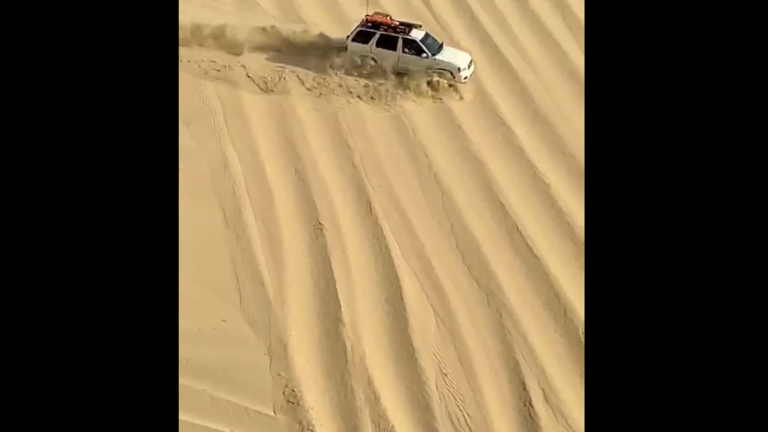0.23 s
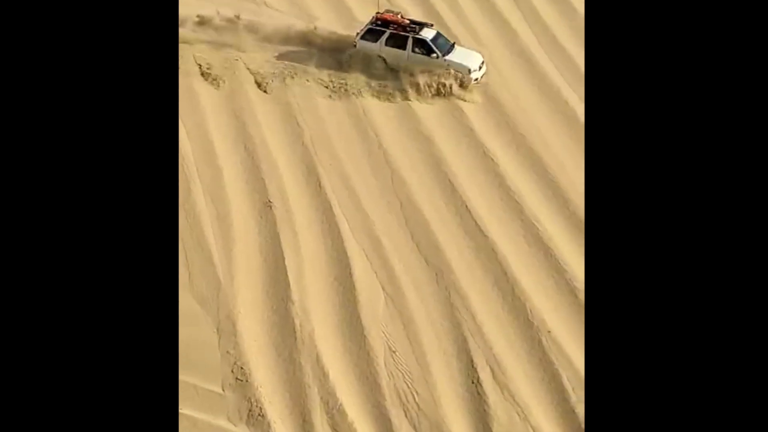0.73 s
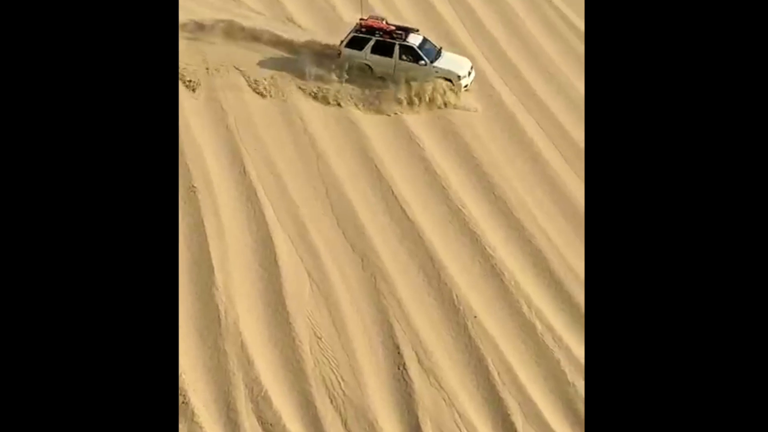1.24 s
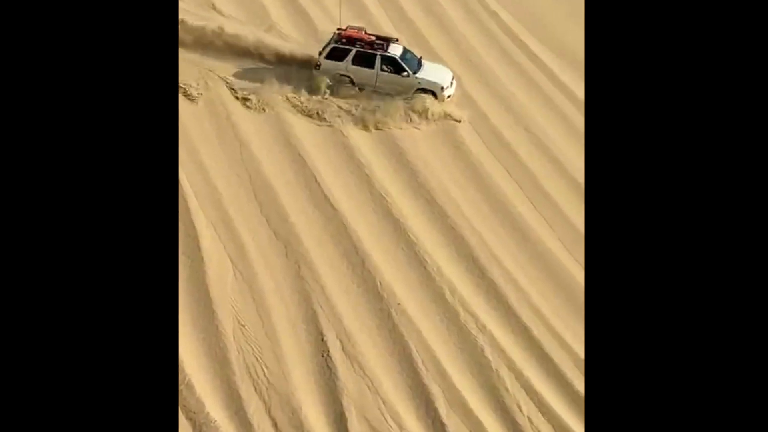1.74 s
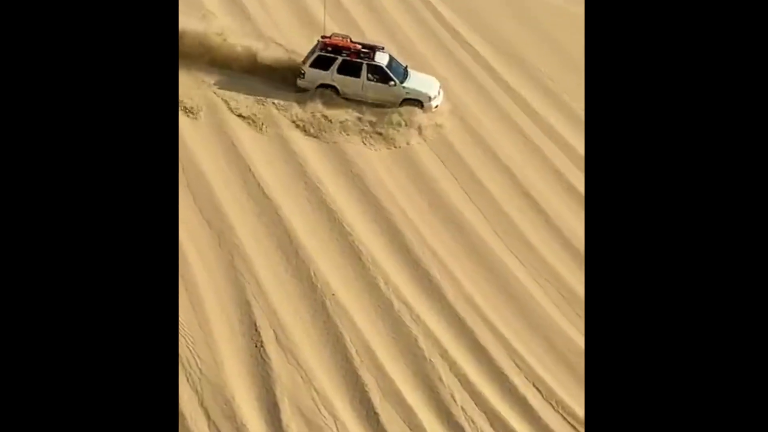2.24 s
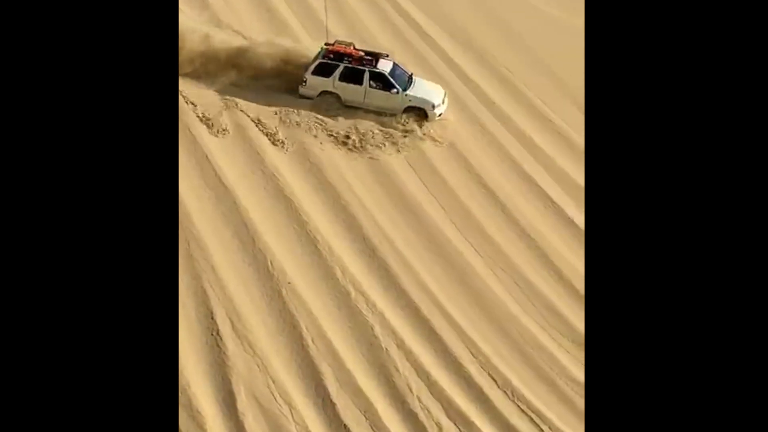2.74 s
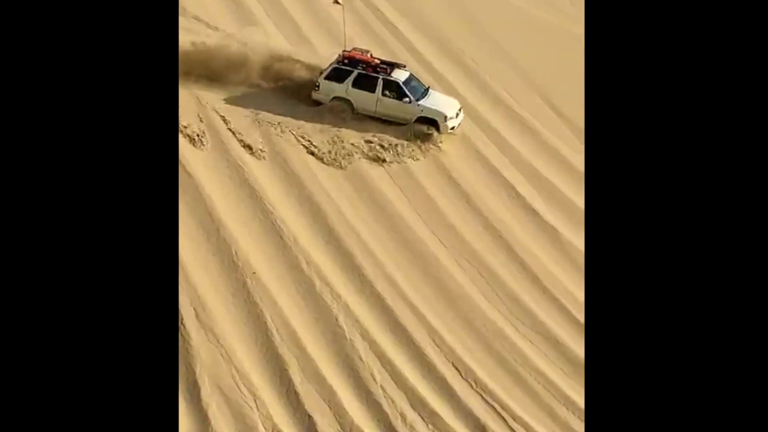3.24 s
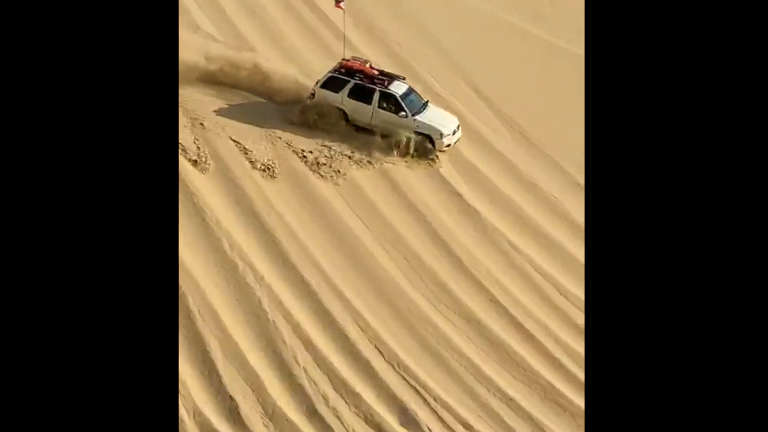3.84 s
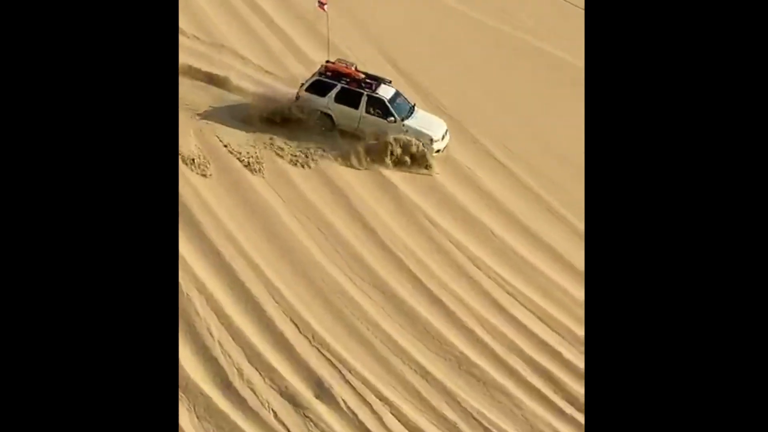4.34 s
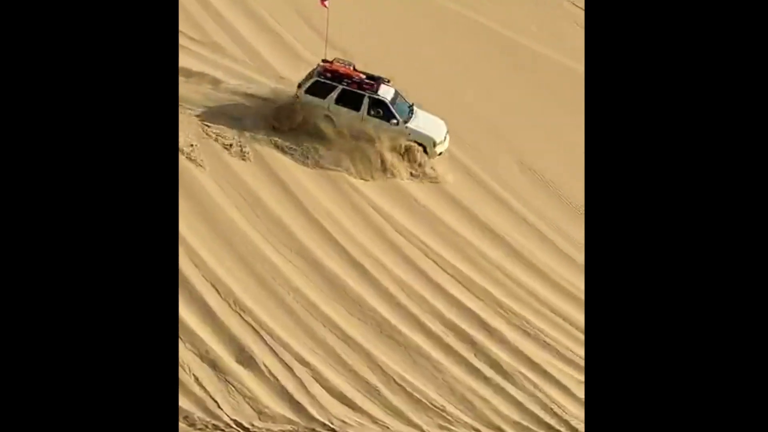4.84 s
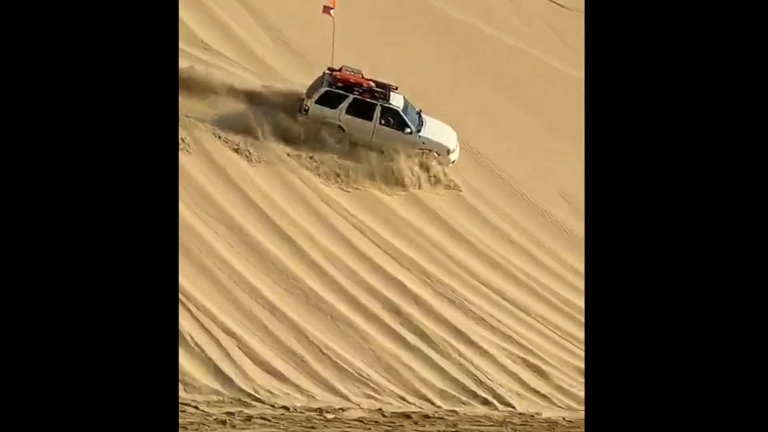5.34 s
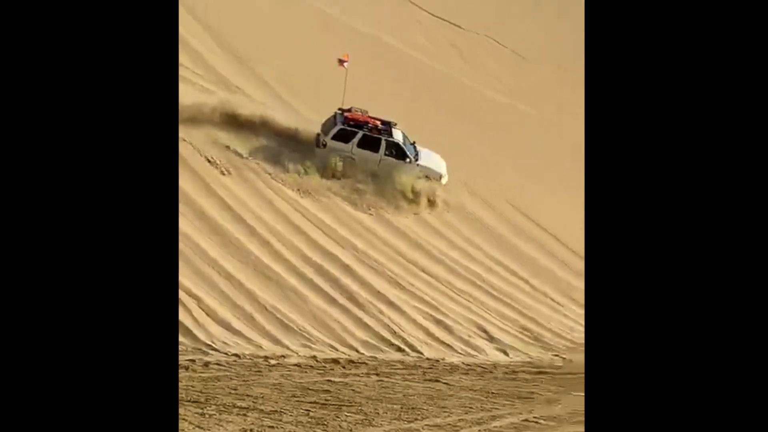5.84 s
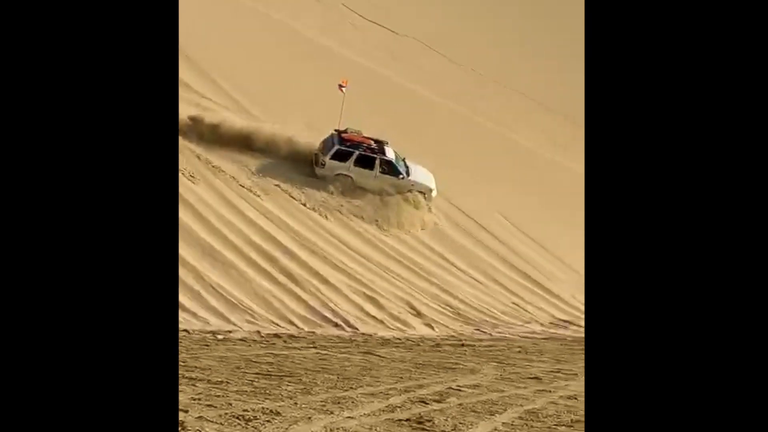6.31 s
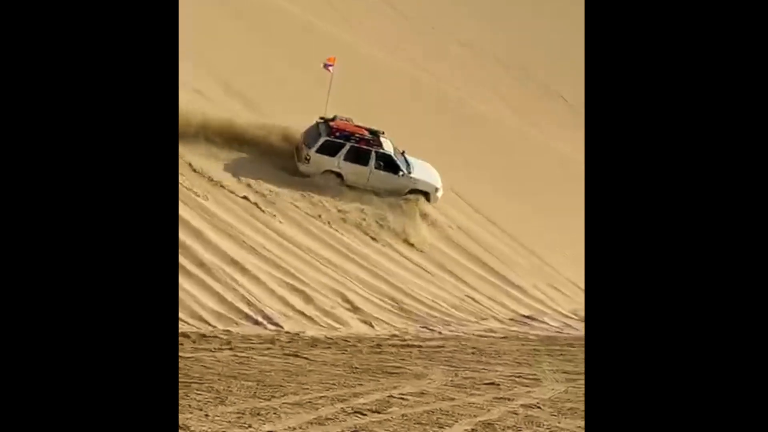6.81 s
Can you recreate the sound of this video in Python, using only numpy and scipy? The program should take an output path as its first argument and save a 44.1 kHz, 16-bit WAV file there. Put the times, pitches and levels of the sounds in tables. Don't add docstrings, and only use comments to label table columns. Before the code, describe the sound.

Outdoors on an open dune, an off-road vehicle works at full load some distance away: raspy intake roar, droning engine tone and hissing sand spray, with small grit ticks. Heavy wind buffets the hand-held stereo microphone in the first two seconds. The drone then recedes and a lower eight-cylinder exhaust rises behind, with engine and sand surging near the end.

```python
import sys
import numpy as np
from scipy import signal
from scipy.fft import rfft, irfft, next_fast_len
from scipy.io import wavfile
from scipy.ndimage import uniform_filter1d, map_coordinates

SR = 44100
rng = np.random.default_rng(int(sys.argv[2]) if len(sys.argv) > 2 else 0)


def voltage_ratio(decibels):
    exponent = np.asarray(decibels, float) / 20
    return 10 ** exponent


def log_audio(samples):
    frames = np.atleast_2d(samples).T
    limited = np.clip(frames, -1, 1)
    pcm = np.round(limited * 32767).astype(np.int16)
    wavfile.write(sys.argv[1], SR, pcm)


N = 311787


def unit(x):
    return x / np.sqrt(np.mean(x ** 2) + 1e-20)


def along(points, hz):
    f, v = np.transpose(points)
    return np.interp(np.log(hz + 1), np.log(f + 1), v)


def curves(rows):
    s, *cols = np.transpose(rows)
    return [np.interp(np.arange(N) / SR, s, c) for c in cols]


def wobble(rate):
    return map_coordinates(rng.standard_normal(4000), [np.arange(N) * np.clip(rate, 0, 500) / SR])


def gate(start, length, rise, fall):
    t = np.arange(N) / SR - start
    return np.clip(np.minimum(t / rise + .5, (length - t) / fall + .5), 0, 1)


def filtered(x, response):
    m = next_fast_len(N + 8192)
    return irfft(rfft(x, m) * response(np.fft.rfftfreq(m, 1 / SR)), m)[..., :N]


def rush(spectrum, patchy_db):
    z = signal.stft(rng.standard_normal((2, N)), nperseg=512)[2]
    field = uniform_filter1d(rng.standard_normal(z.shape[1:]), size=3, axis=0)
    field = uniform_filter1d(field, size=36, axis=1)
    pair = signal.istft(z * voltage_ratio(patchy_db * unit(field)), nperseg=512)[1][:, :N]
    return unit(filtered(pair, lambda hz: voltage_ratio(along(spectrum, hz))))


def order(firing_hz, multiple, flutter_db, smear):
    phase = 2 * np.pi * multiple * np.cumsum(firing_hz) / SR
    phase = phase + smear * wobble(14) + rng.uniform(0, 2 * np.pi)
    return unit(voltage_ratio(flutter_db * wobble(18)) * np.sin(phase))


def climber():
    # (time [s], firing rate [Hz], 4th order level [dB], facing: 3rd order over 4th [dB])
    near_engine = [(0, 256.5, -43, 0), (.58, 257, -41, 1), (.85, 246.5, -44, 1), (1.08, 253.5, -40, -1),
                   (1.42, 248.5, -43, 0), (1.75, 263, -42, -6), (2.0, 255.5, -47, -4), (2.3, 262, -47, -4),
                   (2.6, 257, -47, -6), (2.88, 255, -42, -10), (3.15, 249.5, -38, -12),
                   (3.42, 243.5, -39, -10), (3.53, 243, -58, 4), (5.3, 250, -60, 10), (5.9, 250, -54, 8),
                   (6.3, 254, -48, 3), (6.7, 251, -50, 5), (7.07, 252, -47, 0)]
    # (multiple [1], level re 4th order [dB])
    sixths = [(19 / 6, -13), (21 / 6, -11), (23 / 6, -13), (7, -15), (8, -14)]
    firing, fourth_db, facing_db = curves(near_engine)
    tone = voltage_ratio(fourth_db + facing_db) * order(firing, multiple=3, flutter_db=2.5, smear=.45)
    tone += voltage_ratio(fourth_db) * order(firing, multiple=4, flutter_db=2.5, smear=.35)
    tone += voltage_ratio(fourth_db - 12) * order(firing, multiple=25 / 6, flutter_db=2.5, smear=.3)
    sings_out = gate(1.75, .6, rise=.25, fall=.25)
    tone += voltage_ratio(-43) * sings_out * order(firing, multiple=23 / 6, flutter_db=4, smear=.4)
    for multiple, db in sixths:
        tone += voltage_ratio(fourth_db + db + 2.5 * wobble(2)) * order(firing, multiple, flutter_db=3, smear=.5)
    return tone


def roar():
    # (time [s], engine load level [dB], thrown sand level [dB])
    wheel_work = [(0.0, -53.5, -50.5), (0.06, -37.5, -46), (0.69, -38, -43.5), (0.81, -37.5, -42.5),
                  (1.08, -37, -44), (1.34, -40.5, -43), (2.11, -36.5, -45.5), (2.64, -32, -41),
                  (3.01, -38.5, -41.5), (3.31, -35.5, -41.5), (3.8, -39, -45), (5.4, -38, -42.5),
                  (5.55, -37.5, -45.5), (5.9, -33.5, -41.5), (6.4, -33, -39), (6.81, -31.5, -41),
                  (7.07, -32, -40.5)]
    # (frequency [Hz], density [dB per Hz])
    intake_colour = [(500, -120), (670, -44), (705, -5.5), (770, 1), (921, -3), (1000, -5), (1090, -11.5),
                     (1180, -6.5), (1500, -11), (1700, -35), (2500, -120)]
    # (frequency [Hz], density [dB per Hz])
    spray_colour = [(880, -11), (1500, -3.5), (1950, 0), (2120, -4), (2310, -2), (2480, -6.5), (3000, -5.5),
                    (3900, -46.5), (6600, -120)]
    # (frequency [Hz], density [dB per Hz])
    fizz_colour = [(2000, -120), (2750, -38.5), (3000, -2.5), (3400, 0), (3800, 0), (4200, -4.5),
                   (4600, -8), (5050, 0), (5300, -39.5), (6500, -120)]
    # (frequency [Hz], density [dB per Hz])
    hiss_colour = [(4000, -120), (4850, -35), (5100, -3), (5600, 0), (6300, -2), (7000, -6), (7700, -10),
                   (8500, -12), (9500, -16), (10100, -17), (11100, -12), (11850, -14), (12000, -90)]
    load_db, sand_db = curves(wheel_work)
    mean_db = sand_db.mean()

    def layer_db(under_db, grows):
        return mean_db + under_db + grows * (sand_db - mean_db) + 0.6 * wobble(2.604)

    slap = wobble(9) + 0.43 * wobble(25)
    intake = voltage_ratio(load_db - 1.5) * rush(intake_colour, patchy_db=2.5)
    spray = voltage_ratio(layer_db(0, grows=0.69) + 0.24 * slap) * rush(spray_colour, patchy_db=2)
    fizz = voltage_ratio(layer_db(-5.5, grows=0.8) + 0.54 * slap) * rush(fizz_colour, patchy_db=1.8)
    hiss = voltage_ratio(layer_db(-5, grows=1) + .5 * slap) * rush(hiss_colour, patchy_db=2.07)
    return intake + spray + fizz + hiss


def bounce(x):
    # (start [s], end [s], centre [Hz], gain [dB])
    streaks = [(1.6, 3.1, 3400, 4.5), (2.5, 2.5, 3300, 6), (1.8, 3.05, 1920, 4), (2.5, 3, 3770, -3),
               (3.6, 7, 2440, -0.5), (3, 4.6, 1050, 6), (3.9, 4.3, 2250, -8), (4.55, 4.9, 1167, 9.5),
               (4, 6.4, 957, -8), (3.5, 2.8, 3100, -1.5), (4.2, 4.8, 1590, -5), (4.5, 5.5, 1290, 4),
               (5.8, 6.2, 2060, -9), (6, 6.4, 5930, -3.5), (5.6, 6.15, 1800, 0.5), (6.5, 6.45, 2800, 1),
               (6, 7.4, 4600, 2), (6, 11, 5050, 7), (5.5, 7.1, 4100, 3.5), (6.6, 6.1, 1100, -3.5),
               (5.8, 6.7, 3700, 4), (6, 6.6, 2730, 4.5), (8.1, 5, 3400, 5.5), (5.5, 7.9, 1350, -4.5),
               (5.5, 5.9, 1240, -8), (3.6, 5, 3900, 0), (5, 4.4, 1650, 1.5), (6.6, 8, 3200, 1),
               (3.5, 3.05, 930, -7.5), (3.5, 2.7, 1800, 0), (2.2, 2.1, 2500, 1.5), (1.7, 1.94, 4200, 6),
               (0.5, 0.96, 970, 0), (5.5, 5.2, 4300, 2), (7, 7.3, 4300, 3), (5.8, 7.2, 4350, 3.5),
               (1.3, 2.2, 800, 3.5), (2.5, 3.15, 600, -7), (2.1, 3.06, 760, -6), (6, 7.2, 2300, -5),
               (6.3, 6.4, 13000, -0.5), (6, 7.2, 5300, -6), (6.85, 7.2, 2200, 10), (6.1, 7.2, 2060, 3.5)]
    streak_db, width = 2, 0.073
    hz, t, z = signal.stft(x, SR, nperseg=2048, noverlap=1536)
    field = uniform_filter1d(rng.standard_normal(z.shape[1:]), size=2, axis=0)
    field = uniform_filter1d(field, size=24, axis=1)
    gain_db = streak_db * unit(field)
    for start, end, centre_hz, db in streaks:
        progress = np.clip((t - start) / (end - start), 0, 1)
        swell = np.sqrt(np.abs(np.sin(np.pi * progress)))
        band = np.exp(-((hz / centre_hz - 1) / width) ** 2)
        gain_db = gain_db + db * np.outer(band, swell)
    return signal.istft(z * voltage_ratio(gain_db), SR, nperseg=2048, noverlap=1536)[1][:, :N]


def murmur():
    # (start [s], length [s], depth at the edge band [dB])
    guard = [
        (0.405, 0.1, -12),
        (0.7, 0.065, -22),
        (0.95, 0.053, -14),
        (1.012, 0.079, -23),
        (1.153, 0.078, -29),
        (1.28, 0.04, -14),
        (1.332, 0.094, -28),
        (2.793, 0.25, -4.5),
        (2.948, 0.066, -4),
    ]
    guard_db = sum(db * gate(s, length, rise=0.045, fall=0.045) for s, length, db in guard)
    turn_db = -6 * gate(5.17, N / SR, rise=0.96, fall=1)
    return voltage_ratio(-39.5 + turn_db + 0.56 * guard_db), voltage_ratio(-43 + guard_db)


def steadied(x):
    power = np.abs(uniform_filter1d(x ** 2, size=int(0.055 * SR), axis=-1)) + 1e-3
    return unit(x / power ** (0.44 / 2))


def wind():
    # (time [s], strength [dB], reach: flutter over rumble [dB])
    breeze = [(0, -42, -10), (.3, -36.5, -6), (.7, -34, -18.5), (1.11, -34, -20), (1.4, -32.5, -18),
              (1.8, -27.5, -7), (2.2, -33.5, -3), (2.38, -34.5, -3.5), (2.6, -32.5, -1), (2.74, -36.5, -4),
              (2.82, -38, -10), (3.5, -36, -15.5), (4.2, -41, -19.5), (4.8, -41.5, -13), (5.2, -33, -17.5),
              (5.85, -38.5, -6), (6.5, -36.5, -10), (7.07, -32.5, -15.5)]
    # (start [s], length [s], strength [dB], reach [dB])
    gusts = [(0.256, 0.066, -28.5, -21.5), (0.426, 0.067, -29, -10.5), (0.511, 0.035, -23, -10),
             (0.553, 0.043, -23, -14.5), (0.591, 0.037, -22, -16), (0.683, 0.026, -31.5, -21),
             (0.989, 0.022, -31.5, -20.5), (1.193, 0.017, -26, -13), (0.728, 0.026, -21, -21),
             (0.775, .03, -16.5, -10), (0.818, 0.095, -16.5, -11), (0.903, 0.037, -18, -16),
             (1.046, 0.026, -22.5, -12), (1.161, 0.04, -26.5, -24), (1.219, 0.07, -17.5, -14.5),
             (1.294, 0.029, -18, -34), (1.338, 0.038, -25, -27), (1.439, 0.098, -27, -20),
             (1.503, 0.071, -16.5, -16), (1.613, 0.071, -24, -10.5), (1.69, .04, -17.5, -7),
             (1.734, 0.029, -17, -7), (1.79, 0.03, -25.5, 0), (2.132, .08, -29.5, -4),
             (3.427, 0.034, -36, -8.5), (3.566, 0.068, -34.5, -10.5), (5.497, .1, -34, -8.5),
             (6.486, 0.11, -36.5, -7), (6.727, 0.071, -35.5, -24)]
    gust_low_db = np.array(np.array([[-4], [2], [0], [0]]))
    # (frequency [Hz], density [dB per Hz])
    rumble_colour = [(20, -65), (33, -15.5), (48, -6), (70, -1), (180, -5.5), (220, -42), (400, -120)]
    # (frequency [Hz], density [dB per Hz])
    body_colour = [(100, -120), (150, -37), (180, 3), (340, 1.5), (390, -23), (600, -120)]
    # (frequency [Hz], density [dB per Hz])
    flutter_colour = [(200, -120), (300, -33.5), (340, -2.5), (437, -0.5), (520, -7.5), (640, -33.5),
                      (800, -120)]
    # (frequency [Hz], density [dB per Hz])
    edge_colour = [(350, -120), (480, -30), (520, 0), (700, -2), (740, -40), (900, -120)]
    shares, offsets_db = np.array([[0], [0.41], [1], [2.5]]), np.array([[0], [-0.5], [0], [0]])
    plume = 2.8

    breeze_db, reach_db = curves(breeze)
    power = voltage_ratio(breeze_db + 1.6 * wobble(12) + shares * reach_db) ** 2
    for s, length, db, reach in gusts:
        gust = voltage_ratio(db + gust_low_db + shares * reach) * gate(s, length, rise=.012, fall=.015)
        power += gust ** 2
    rumble, body, flutter, edge = voltage_ratio(offsets_db) * np.sqrt(power)

    force = np.clip((20 * np.log10(rumble) + 36) / 14, .1, 1)
    lumps = voltage_ratio(force * (1.2 * wobble(30) + 2.5 * wobble(70)))
    lumps /= np.sqrt(np.abs(uniform_filter1d(lumps ** 2, size=4000)) + 1e-9)

    car_flutter, car_edge = murmur()
    eddies = lumps * rumble * steadied(rush(rumble_colour, patchy_db=3))
    eddies += lumps * body * steadied(rush(body_colour, patchy_db=0.0))
    eddies += np.hypot(lumps ** np.sqrt(plume) * flutter, car_flutter) * rush(flutter_colour, patchy_db=2.5)
    return eddies + np.hypot(lumps ** plume * edge, car_edge) * rush(edge_colour, patchy_db=1.0)


def crosswind():
    # (time [s], strength [dB])
    side_air = [(0, -36.5), (.3, -59), (.45, -31), (.62, -40.5), (.85, -26), (1.08, -35), (1.28, -31),
                (1.55, -36.5), (1.9, -40), (2.3, -54.5), (2.85, -32.5), (3.15, -50.5), (5.7, -57),
                (6.1, -43), (6.75, -41), (7.07, -54)]
    # (frequency [Hz], density [dB per Hz])
    side_colour = [(20, -43), (40, -15), (90, -4.5), (320, -2), (460, -7), (780, -6), (1000, -10.5),
                   (1500, -36.5), (2500, -120)]
    strength_db, = curves(side_air)
    flicks = voltage_ratio(2 * wobble(25) + 4.5 * wobble(120))
    return voltage_ratio(strength_db) * unit(flicks * rush(side_colour, patchy_db=1.5)[0]) * [[1], [-1]]


def grit():
    # (time [s], peak [dB], pitch [Hz])
    grains = [(0.0942, -27, 3430), (0.298, -29, 3420), (0.9055, -31.5, 3620), (1.1687, -37.5, 3430),
              (1.207, -27.5, 3410), (1.266, -31, 3700), (1.299, -33, 3130), (1.624, -30.5, 3240),
              (1.698, -29.5, 3700), (2.2473, -29, 3400), (2.5354, -22, 3360), (2.9368, -32, 3540),
              (3.1363, -26, 3500), (3.2163, -31, 3430), (3.396, -23.5, 3230), (3.486, -29.5, 3840),
              (3.681, -29.5, 3500), (3.756, -25.5, 4510), (4.14, -29, 3400), (4.2073, -29, 2610),
              (4.2685, -32.5, 4720), (4.3266, -29.5, 3800), (4.624, -30.5, 4550), (4.948, -33, 4400),
              (5.3702, -30.5, 3360), (5.592, -26.5, 3140), (6.112, -29, 3670), (6.708, -24.5, 3420),
              (6.783, -29, 4450), (7.0484, -31.5, 3320), (0.6444, -34, 3440), (0.9766, -44.5, 3610),
              (1.113, -33, 4740), (2.155, -33, 3680), (2.431, -30.5, 2800), (5.029, -28.5, 2820),
              (5.811, -38, 3950), (6.235, -31.5, 2780), (6.4792, -26.5, 3530), (6.535, -28, 4160),
              (6.626, -33.5, 4770)]
    # (frequency [Hz], density [dB per Hz])
    grit_colour = [(1000, -31.5), (1800, 4.5), (3500, 4.5), (4800, 6), (5600, -3.5), (8000, -11.5),
                   (11000, -25.5)]
    rise_s, crack_t60_s, ring_t60_s = .002, .03, .035
    out, t = np.zeros(N + SR), np.arange(1300) / SR
    cracks = rng.standard_normal((len(grains), len(t)))
    for (s, db, hz), crack in zip(grains, cracks):
        ring = 0.3 * np.sin(2 * np.pi * hz * t) * voltage_ratio(-60 * t / ring_t60_s)
        tick = crack * voltage_ratio(-60 * t / crack_t60_s) + ring
        out[round(s * SR):][:len(t)] += voltage_ratio(db + 1.0) * tick * (1 - np.exp(-t / rise_s))
    return filtered(out[:N], lambda hz: voltage_ratio(along(grit_colour, hz)))


def thumps():
    # (time [s], peak [dB], pitch [Hz])
    slaps = [(0.515, -13.5, 296), (0.588, -2, 146), (0.601, -15.5, 129), (0.783, -12, 90), (0.812, -5, 185),
             (0.87, -7, 280), (0.91, -3.5, 135), (1.041, -10, 152), (1.053, -12, 255), (1.204, -7, 158),
             (1.267, -10, 143), (1.342, -14, 153), (1.518, -19, 288), (1.548, -7, 167), (1.609, -9.5, 93),
             (1.744, -20, 281), (1.783, -8.5, 296), (2.05, -18, 327), (2.179, -11.5, 397),
             (2.259, -16, 105), (2.571, -18, 135), (2.6, -24, 137), (2.624, -32, 104), (2.662, -12.5, 380),
             (2.698, -15.5, 176), (3.455, -15.5, 123), (5.468, -16.5, 111), (1.508, -12.5, 500),
             (1.848, -8, 288), (2.004, -18.5, 253), (2.094, -15, 300), (2.126, -12, 260), (2.142, -16, 240),
             (2.292, -18.5, 250), (5.701, -19, 152), (6.298, -13.5, 170), (6.497, -10, 164),
             (6.599, -12, 199), (6.642, -10.5, 210), (6.698, -12, 190), (6.78, -14.5, 243),
             (6.813, -17, 130), (6.831, -14, 230), (6.997, -10.5, 203), (0.783, -6, 382), (0.925, -11, 398),
             (1.751, -10, 420), (5.125, -14.5, 160), (5.205, -15, 165)]
    under_peak_db, width_cycles = -6.5, 0.86
    out, t = np.zeros(N + SR), np.arange(-900, 900) / SR
    for s, db, hz in slaps:
        push = np.cos(2 * np.pi * hz * t + 0.57) * np.exp(-(t * hz / width_cycles) ** 2)
        out[round(s * SR) - 600:][:len(t)] += voltage_ratio(db + under_peak_db) * push
    return out[:N]


def swells():
    # (start [s], end [s], start pitch [Hz], end pitch [Hz], level [dB])
    tones = [(5.0, 5.18, 2760, 2850, -53), (3.9, 4.45, 244, 248, -46), (5.85, 6.3, 237, 240, -44),
             (6.36, 6.52, 236, 248, -30), (6.5, 6.74, 250, 248, -26.5), (6.73, 6.86, 248, 240, -26),
             (6.93, 7.04, 226, 216, -30), (3.55, 3.75, 2720, 2680, -56), (4.98, 5.4, 132, 133, -36),
             (6.76, 6.85, 126, 126, -35), (6.1, 7.3, 217, 212, -36), (6.1, 7.2, 304, 300, -44),
             (4.35, 5.1, 460, 468, -44), (4, 4.5, 1036, 1036, -48), (4.55, 5.1, 892, 911, -45),
             (4.6, 4.95, 2700, 2697, -48), (3.7, 4.15, 1730, 1770, -51), (5.8, 6.6, 1960, 1940, -49),
             (3.33, 3.52, 4700, 4660, -54), (5.75, 7.2, 2300, 2280, -52), (6.2, 6.6, 3780, 3740, -55),
             (6.7, 7.2, 3350, 3350, -52), (5.75, 7.2, 4120, 4150, -55), (2.3, 2.55, 835, 830, -46),
             (2.33, 2.365, 830, 830, -39), (2.6, 2.645, 830, 825, -33), (2.84, 3, 980, 978, -41),
             (2.6, 3.3, 5500, 5500, -58), (4.1, 4.29, 4440, 4450, -56)]
    out = np.zeros(N)
    for start, end, start_hz, end_hz, db in tones:
        u = np.clip((np.arange(N) / SR - start) / (end - start), 0, 1)
        pitch = start_hz + u * (end_hz - start_hz)
        swell = np.sqrt(np.abs(np.sin(np.pi * u)))
        out += voltage_ratio(db) * swell * order(pitch, multiple=1, flutter_db=2.5, smear=.3 + start_hz / 4000)
    return out


def boomer():
    # (time [s], firing rate [Hz], level [dB])
    far_engine = [(3.3, 150, -60), (3.8, 151, -48), (4.3, 152, -47), (4.8, 155, -44), (4.92, 156, -36),
                  (5.12, 161, -30), (5.32, 165, -30), (5.38, 165, -41), (5.9, 167, -42), (6.05, 170, -37),
                  (6.22, 171, -35), (6.33, 171, -33), (6.45, 171, -37), (6.8, 170, -38), (7.07, 168, -33)]
    # (multiple of firing [1], level [dB])
    far_orders = [(.5, -16), (.75, -8), (1, 3), (1.25, -17.5), (2, -25.5)]
    # (frequency [Hz], density [dB per Hz])
    cavity_colour = [(60, -120), (100, -27), (125, 7), (165, -7), (185, -18.5), (300, -120)]
    firing, level_db = curves(far_engine)
    lines = sum(voltage_ratio(db) * order(firing, k, flutter_db=3, smear=.4) for k, db in far_orders)
    throb_db = 3.5 * np.sin(np.pi / 2 * np.cumsum(firing) / SR)
    lines = unit(voltage_ratio(throb_db) * lines) * np.std(lines)
    return voltage_ratio(level_db) * (lines + voltage_ratio(-1.5) * rush(cavity_colour, patchy_db=1)[0])


def ports(shared, own):
    # (frequency [Hz], correlation [1])
    alike = [(60, .99), (200, .96), (430, .85), (800, .85), (1100, .55), (1450, .97), (1900, .95),
             (2600, .84), (3300, .94), (4100, .97), (4600, .85), (5000, .87), (5600, .85), (6600, .75),
             (7400, .9), (8000, .99)]
    # (frequency [Hz], level [dB])
    louder = [(300, 0), (800, 1.5), (1000, 5.5), (1150, 9.5), (1400, 3), (1800, 2.5), (2200, 1.6),
              (3000, 2)]
    # (frequency [Hz], phase [rad])
    lead = [(60, 0), (500, -.1), (800, .45), (1100, .4), (1450, 0), (2800, .45), (3200, .1), (4000, .07),
            (4600, .8), (4880, 2.6), (5040, 3.35), (5200, 2.4), (5500, 1.5), (6300, 1.9), (6900, 2.6),
            (7300, 2.85), (7900, np.pi)]

    def turn(hz):
        return np.arccos(np.clip(along(alike, hz), 0, 1)) / 2

    def shade(hz):
        return voltage_ratio(along(louder, hz) / 2) * np.exp(.5j * along(lead, hz))

    left = filtered([shared, own], lambda hz: shade(hz) * [np.cos(turn(hz)), np.sin(turn(hz))])
    right = filtered([shared, own], lambda hz: [np.cos(turn(hz)), -np.sin(turn(hz))] / shade(hz))
    return np.array([left.sum(axis=0), right.sum(axis=0)])


def scene():
    air = bounce(roar()) + wind()
    shared = air[0] + climber() + grit() + thumps() + swells() + boomer()
    return ports(shared, air[1]) + crosswind()


def joint_stereo(x, under_db):
    # (frequency [Hz], level [dB])
    heard = [(100, -69), (400, -74), (1300, -77), (1700, -74), (4500, -75), (6800, -75), (7600, -79),
             (8600, -80), (12000, -81)]
    hz, _, z = signal.stft([x[0] + x[1], x[0] - x[1]], SR, nperseg=2048)
    band = np.arange(len(hz)) // 8
    power = np.add.reduceat(np.abs(z) ** 2, np.arange(0, len(hz), 8), axis=1) / 8
    power = (power * voltage_ratio(3 * rng.standard_normal(power.shape)))[:, band]
    limit = power[::-1] * voltage_ratio(2 * under_db) + voltage_ratio(2 * along(heard, hz))[:, None]
    total, apart = signal.istft(z * (power > limit), SR, nperseg=2048)[1][:, :N]
    return np.array([total + apart, total - apart]) / 2


def low_pass(x):
    return signal.sosfilt(signal.butter(12, 11950, fs=SR, output="sos"), x)


def record(dry):
    rounded = dry / (1 + np.abs(dry / .62) ** 4) ** .25
    mix = joint_stereo(rounded, under_db=-13)
    return low_pass(mix)


dry = scene()
out = record(dry)
log_audio(out)
```